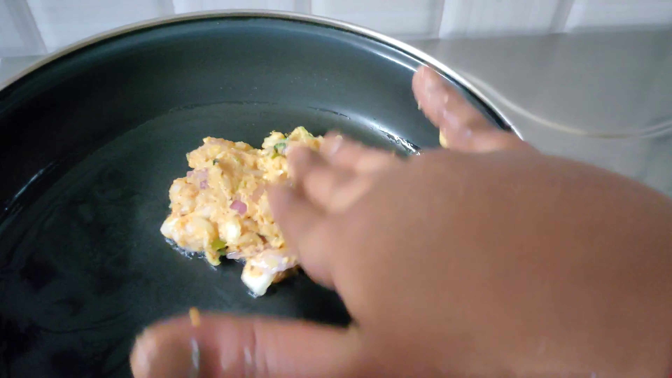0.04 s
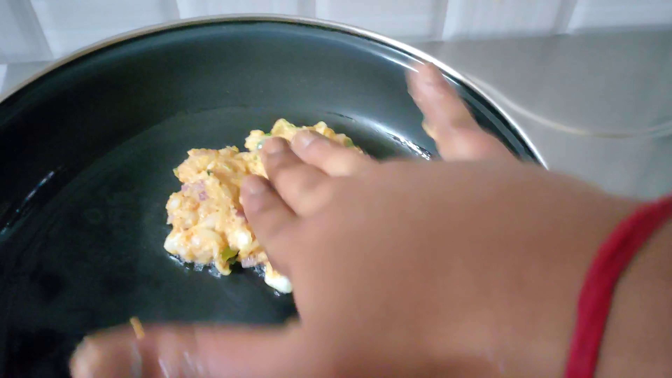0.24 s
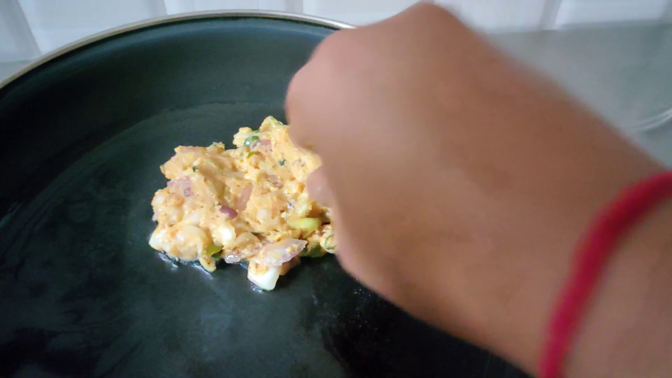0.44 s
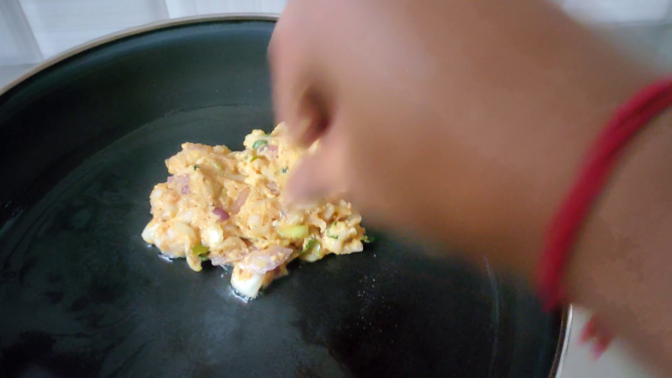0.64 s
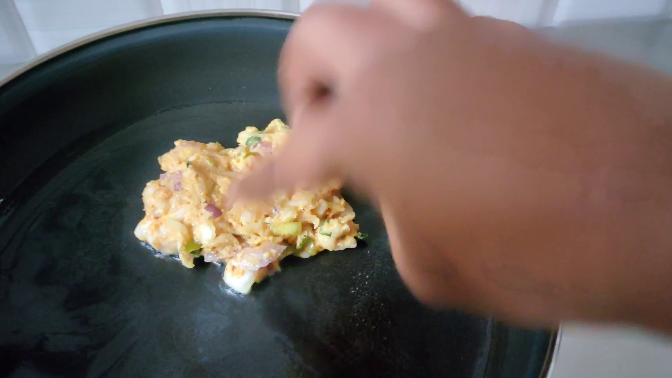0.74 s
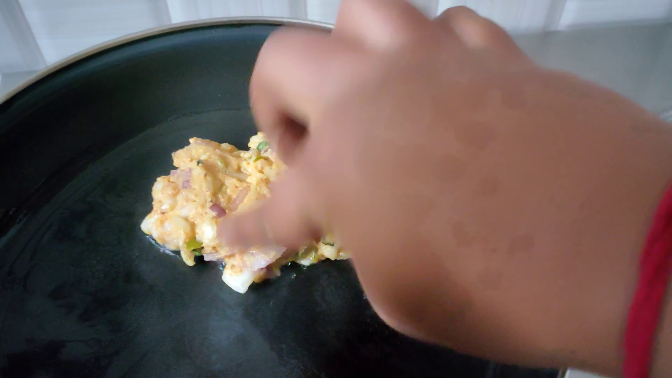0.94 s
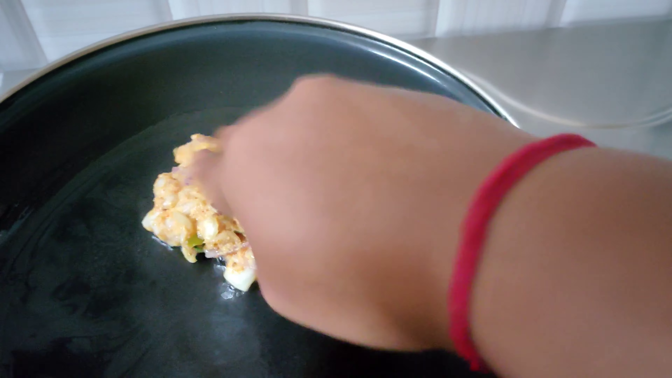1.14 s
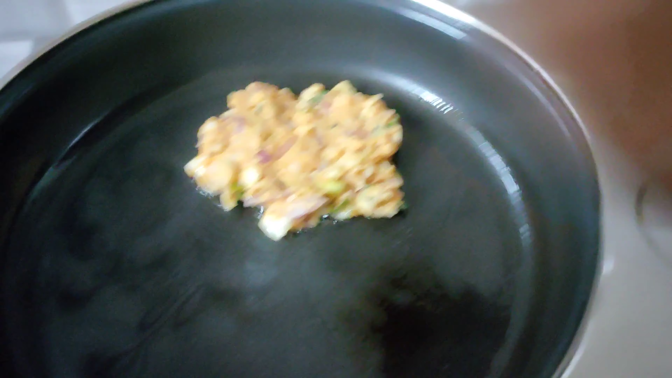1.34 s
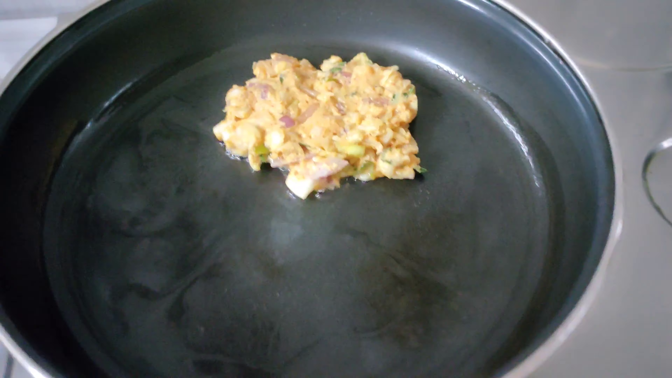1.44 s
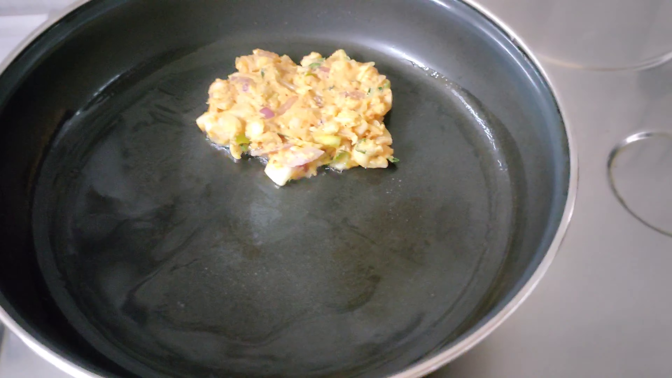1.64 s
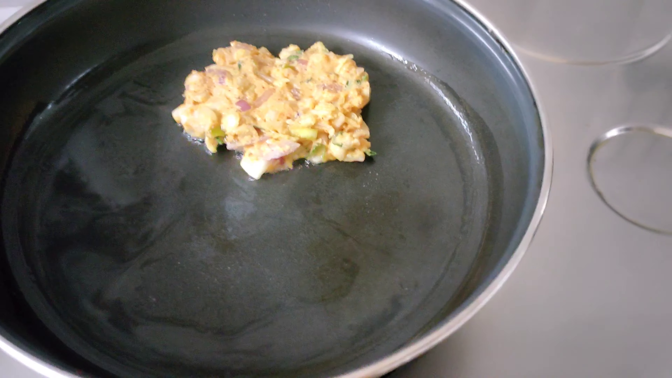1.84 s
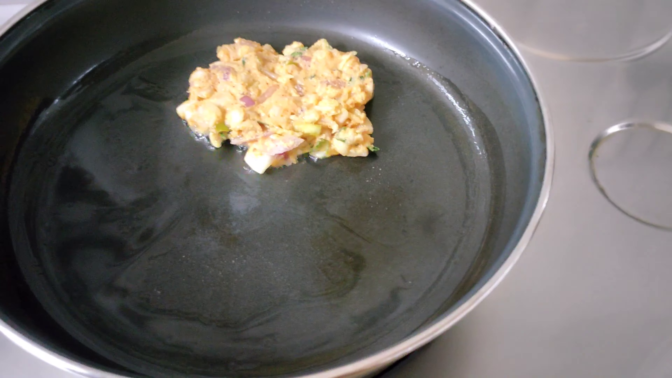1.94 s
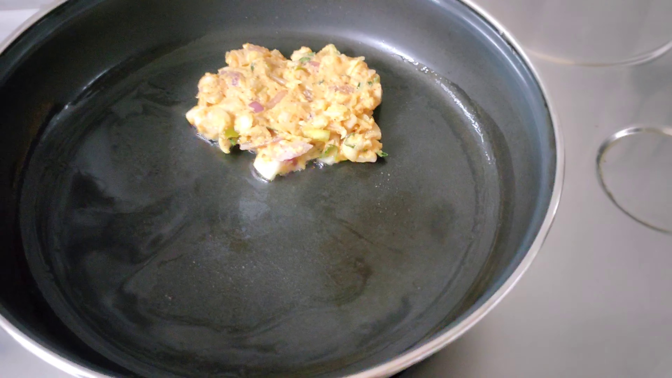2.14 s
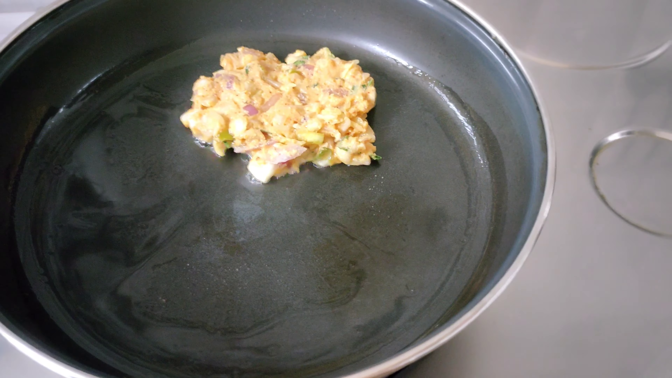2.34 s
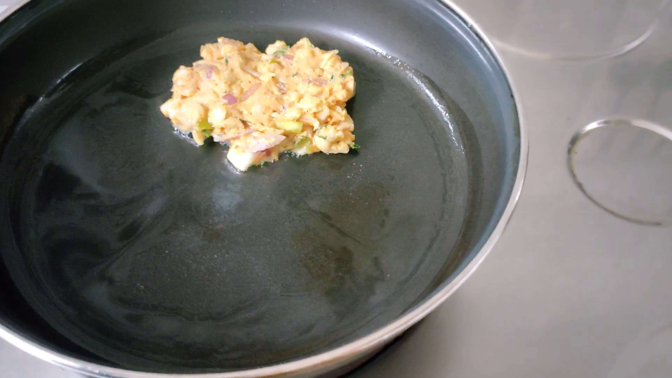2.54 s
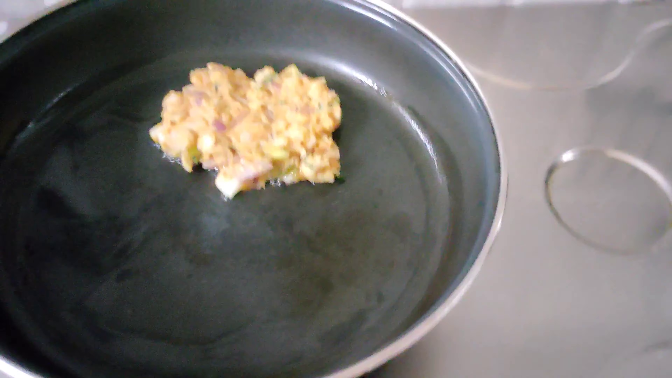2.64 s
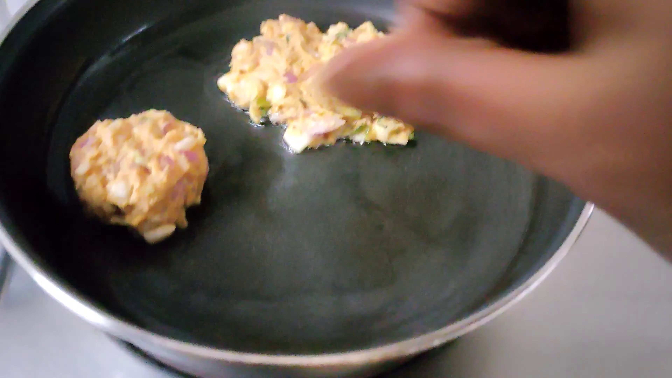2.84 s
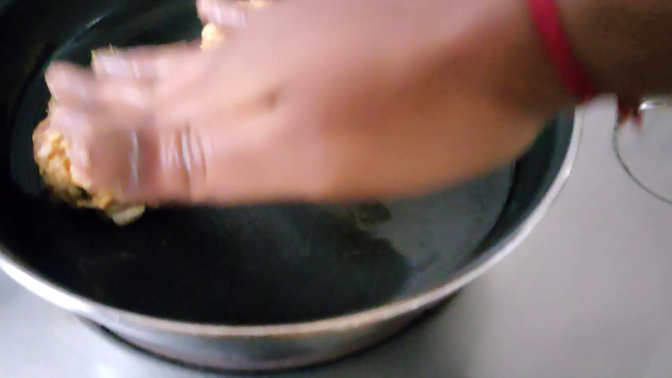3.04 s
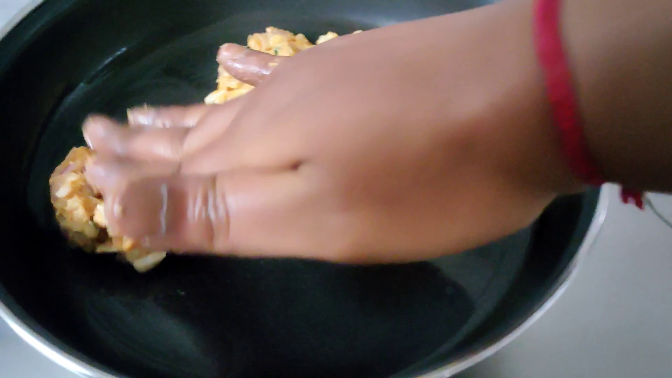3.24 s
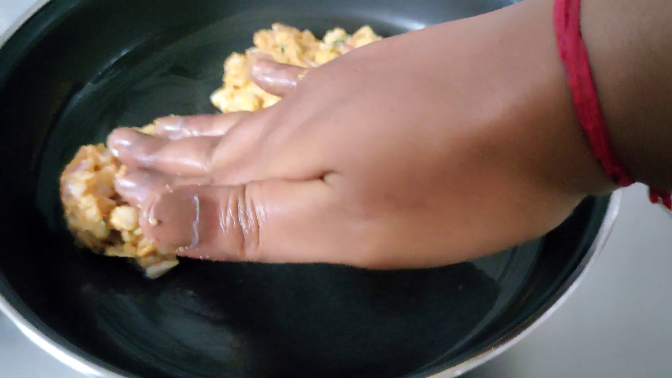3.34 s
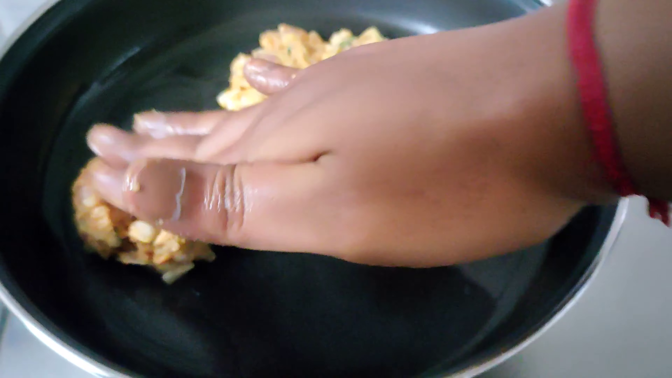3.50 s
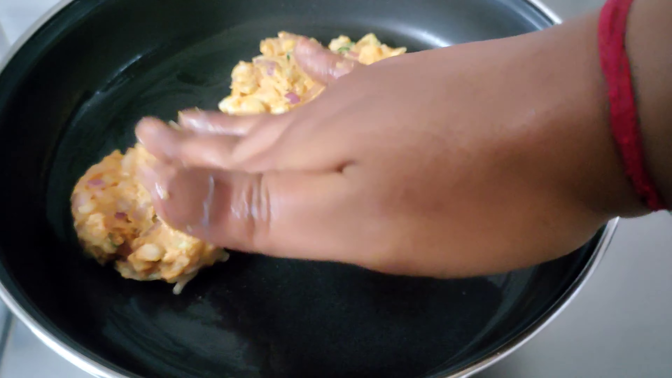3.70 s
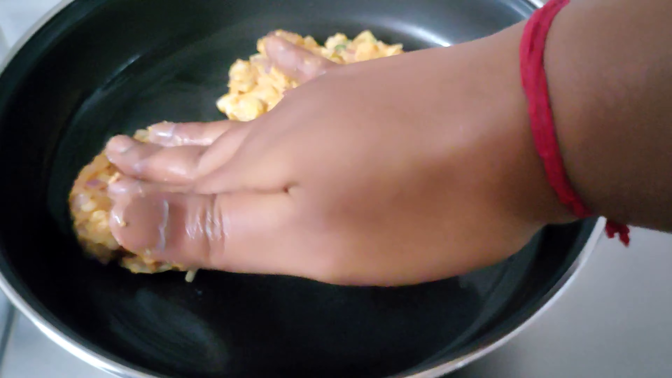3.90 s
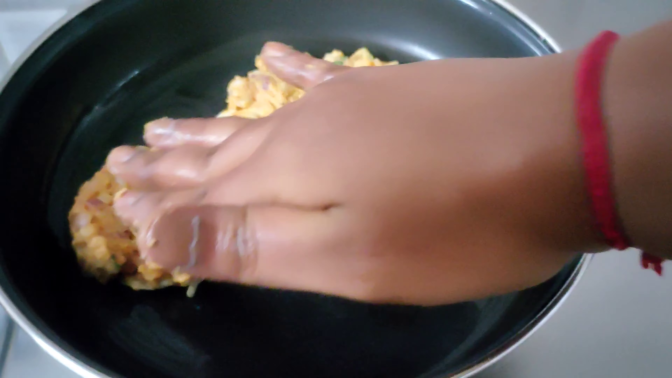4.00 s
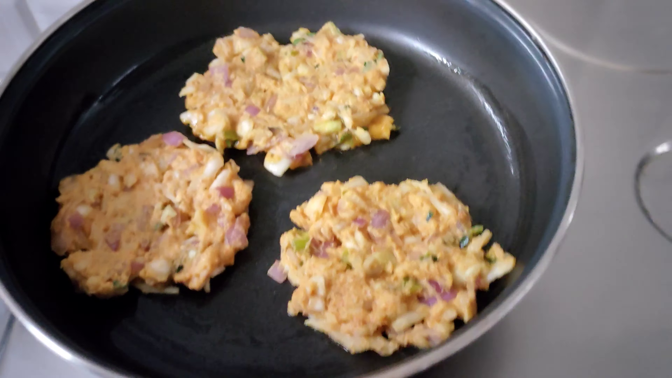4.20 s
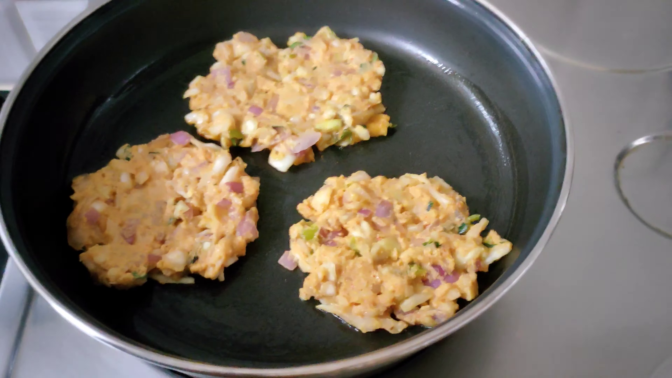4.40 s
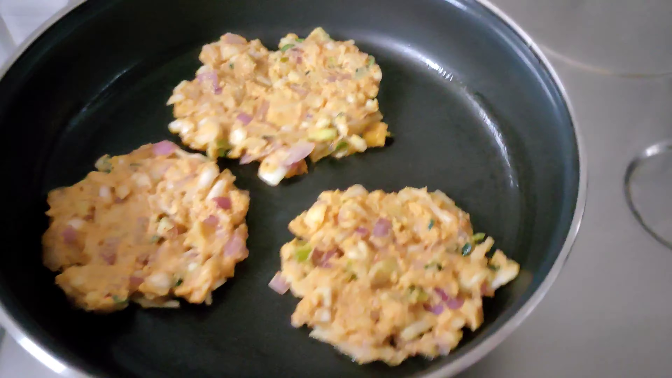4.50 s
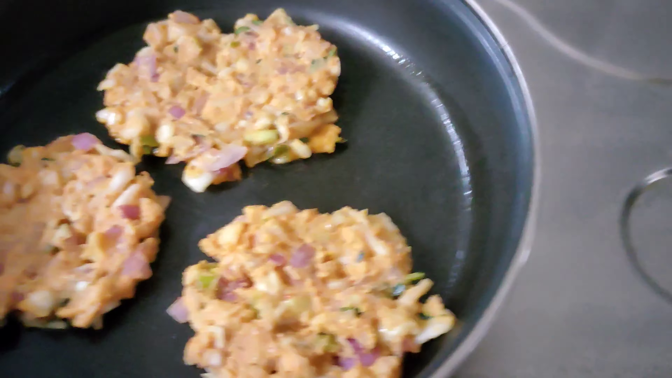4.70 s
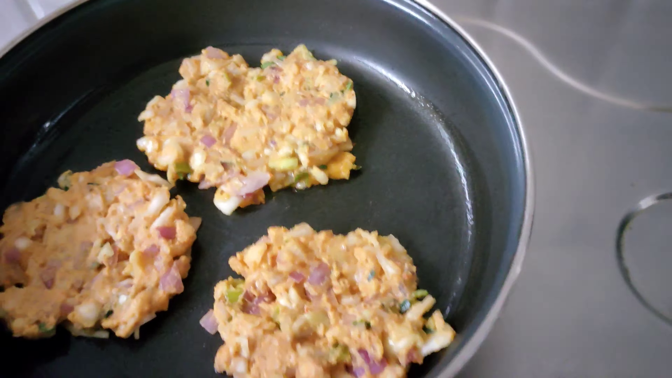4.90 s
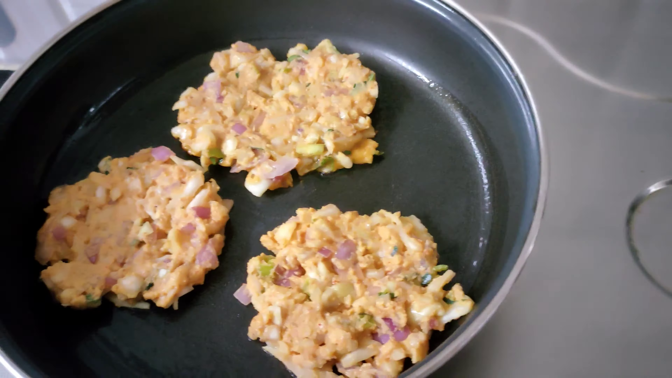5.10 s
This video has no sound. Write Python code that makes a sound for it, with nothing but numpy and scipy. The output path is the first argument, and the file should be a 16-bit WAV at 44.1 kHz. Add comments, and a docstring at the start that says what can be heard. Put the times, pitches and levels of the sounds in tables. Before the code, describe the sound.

Soft continuous frying with crackles and one sharp early pop, over a faint kitchen hum, interrupted by loud rubbing and small knocks on the camera.

```python
"""Fritters sizzle gently in a film of oil in a non-stick pan while a hand pats them flat: uneven bursts of
noise over a steady wash, growing from one fritter to a full pan. Steam spits in swells of grainy noise, and
larger bubbles pop as short bands of noise. A kitchen fan hums on three wavering tones over a low rumble.
The grip on a camera held close shifts: fingers scrape its case (gritty noise through resonances), bump it
(short dying tones) and brush over the microphone ports (a hiss and a hollow note)."""
import sys
import numpy as np
from scipy import signal
from scipy.fft import rfft, irfft
from scipy.io import wavfile

SR = 44100
rng = np.random.default_rng(int(sys.argv[2]) if len(sys.argv) > 2 else 0)


def transcribe(u):
    """Save the signal u as a 16-bit wav file named by the first command-line argument.

    u: samples, shape (n,) or (channels, n), limited to [-1, 1]; the rate is SR.
    q: integer samples, one column per channel.
    """
    v = np.clip(np.atleast_2d(u).T, -1, 1)
    q = np.round(v * 32767).astype(np.int16)
    wavfile.write(sys.argv[1], SR, q)


N = 262395
T = np.arange(N) / SR  # time of every sample [s]
HZ = np.fft.rfftfreq(N, 1 / SR)  # frequency of every spectrum bin


def amp(db):
    """Turns decibels into a plain factor."""
    return 10 ** (np.asarray(db) / 20)


def evened(x):
    """Scales a signal to an average (RMS) size of one."""
    return x / np.sqrt(np.mean(x ** 2) + 1e-20)


def read(points):
    """A spectrum, joined by straight lines on a log-frequency axis."""
    hz, value = np.transpose(points)
    return np.interp(np.log(HZ + 1), np.log(hz + 1), value)


def follow(rows):
    """The columns of a curve over time, at every sample."""
    s, *columns = np.transpose(rows)
    return [np.interp(T, s, column) for column in columns]


def add(mix, s, sound):
    """Lays a sound into the mix at time s."""
    part = mix[..., round(s * SR):][..., :sound.shape[-1]]
    part += sound[..., :part.shape[-1]]


def colour(x, db):
    """Filters with the given gain in dB, causally: it rings after a click, never before."""
    log_gain = irfft(np.log(amp(np.maximum(db, -100))), N)
    # folding the log gain onto positive times makes the filter minimum-phase
    fold = 1 + np.sign(N / 2 - np.arange(N))
    fold[0] = 1
    response = np.exp(rfft(log_gain * fold))
    return irfft(rfft(x) * response, N)


def body(spectrum, modes=()):
    """Gain in dB of a broad colour with resonances standing out of it; passes white noise at equal power."""
    peaks = sum(amp(db) ** 2 / (1 + (2 * (HZ - hz) / width) ** 2) for hz, width, db in modes)
    gain = amp(read(spectrum)) * np.sqrt(1 + peaks)
    return 20 * np.log10(evened(gain))


def pair(x, likeness):
    """Mixes two unrelated channels so that they are as alike as the table says at each frequency."""
    same = np.clip(read(likeness), -1, 1)
    a, b = rfft(x)
    turn = np.arcsin(same) / 2
    left = a * np.cos(turn) + b * np.sin(turn)
    right = b * np.cos(turn) + a * np.sin(turn)
    return irfft([left, right], N)


def treble(x, hz):
    """The part of a sound above hz, with a gentle slope below."""
    return irfft(rfft(x) * HZ ** 2 / (HZ ** 2 + hz ** 2), N)


def grains(per_s, spread_db, length, wash):
    """Tiny bursts of uneven size, timed alike in both channels, over a wash of countless smaller ones."""
    struck = rng.random(N) < per_s / SR
    size = amp(spread_db * np.minimum(rng.exponential(1, N), 5)) * struck
    power = signal.lfilter([1], [1, -np.exp(-2 / (length * SR))], size ** 2)  # length: dying time in s
    wash = np.clip(wash, 0, 1)
    loudness = np.sqrt(wash + (1 - wash) * power / power.mean())
    return loudness * rng.standard_normal((2, N))


def drift(hz):
    """Random wander of unit (RMS) size, with little movement faster than hz."""
    return evened(irfft(rfft(rng.standard_normal(N)) / (1 + (HZ / hz) ** 4), N))


def echoes(x, t60):
    """A short, dense tail, different on each side; it falls by 60 dB in t60 seconds."""
    t = T[:SR // 3]
    tail = rng.standard_normal((2, len(t))) * amp(-60 * t / t60)
    return signal.fftconvolve(x, tail / np.linalg.norm(tail[0]), axes=1)[:, :N]


def swells(s, db, rise, hold, fall):
    """Soft onsets that are full at their times s, hold, and die away; their powers add."""
    power = np.zeros(N)
    for full_s, full_db, up, stay, down in np.broadcast(s, db, rise, hold, fall):
        near = (T > full_s - 3 * up) & (T < full_s + stay + 8 * down)
        t = T[near] - full_s
        rising = -(t / up) ** 2
        dying = -np.maximum(t - stay, 0) / down
        power[near] += (amp(full_db) * np.exp(np.where(t < 0, rising, dying))) ** 2
    return np.sqrt(power)


def frying(full):
    """Level and treble lift of the sizzle in dB: they follow the hand's pressure and how full the pan is."""
    # the hand presses wet batter onto the pan and it fries harder:
    # full_pressure_s, hold_s, extra_db, treble_lift_db
    presses = [(0.0, 0.88, 2.0, 5), (1.05, 0.25, 2.5, 2), (2.98, 0.96, 2, 2.5)]
    rise_s, fall_s = 0.081, 0.033
    # the oil left to itself: one fritter, then what the full pan adds
    one_db, one_lift_db = -49.5, -1.5
    full_db, full_lift_db = 0.72, -4
    level_db = one_db + full_db * full
    lift_db = one_lift_db + full_lift_db * full
    for s, hold_s, extra_db, bright_db in presses:
        pressure = swells(s, 0, rise_s, hold_s, fall_s)
        level_db = level_db + extra_db * pressure
        lift_db = lift_db + bright_db * pressure
    return level_db, lift_db


def sizzle():
    """Steam bubbles burst at the rim of the batter and make grainy noise; spurts of steam spit from under it."""
    # colour of the fizz of one fritter and of the full pan: pitch_hz, level_db (per Hz)
    fizz_one = [(250, -19.5), (500, -14), (850, -11.5), (1100, -2.5), (1350, -4.5), (1600, -1.5),
                (2400, -0.5), (3300, -4), (6000, -2), (8000, -7), (11000, -11), (15500, -8)]
    fizz_full = [(250, -33), (500, -8), (900, -2), (1300, -1), (1600, 2.5), (2600, 2.5), (3600, -1),
                 (4900, 6), (6800, 5), (8000, 1), (11000, -4), (15500, -4.5)]
    # the pan fills up: time_s, share of the full pan (0 to 1)
    filling = [(3.7, 0.0), (4.05, 1.0)]
    # which side hears the first fritter, and the full pan, better: pitch_hz, left_minus_right_db
    one_side = [(600, 1.5), (1500, -1.5), (2500, 1.5), (6400, 1.5), (7200, -2.5), (8200, -4.5),
                (10000, -4.5), (12000, -0.5), (15000, 0)]
    full_side = [(500, -1.5), (2500, 0), (4000, 3), (6000, 4.5), (7000, 12), (8000, -0.5), (15000, 0)]
    # spurts of steam from under the batter: full_s, level_db (before the spit is boosted), dying_s
    spurts = [(0.008, -46, .015), (0.085, -51, .1), (0.175, -36, 0.0062), (0.222, -46.5, 0.011),
              (0.384, -43, 0.013), (0.522, -42, 0.026), (0.607, -47, 0.008), (1.012, -52.5, .015),
              (1.079, -46, 0.016), (1.147, -45.5, 0.031), (1.2, -47, .015), (1.911, -47, 0.025),
              (2.37, -51.5, .05), (3.1, -47, 0.07), (3.584, -49, 0.016)]
    spurt_rise_s = 0.01
    # share of the fizz that merges into a wash, and how much the finest fizz flickers
    wash_one, wash_full, flicker_db = .88, .95, 1.4

    full = np.clip(follow(filling)[0], 0, 1)
    level_db, lift_db = frying(full)
    wash = wash_one + (wash_full - wash_one) * full
    bubbles = grains(per_s=530, spread_db=8.5, length=0.002, wash=wash) * amp(1.08 * drift(hz=42.4))
    sides = np.array([[.5], [-.5]])
    one = colour(bubbles, body(fizz_one) + sides * read(one_side))
    many = colour(bubbles, body(fizz_full) + sides * read(full_side))
    fizz = (1 - full) * one + full * many
    # the share of the smallest bubbles keeps changing
    fine_gain = amp(lift_db + flicker_db * drift(hz=35))
    fizz += (fine_gain - 1) * treble(fizz, hz=6240)
    # fine droplets tick on the open oil, less as the pan fills
    ticks = (1 - full) * treble(grains(per_s=65, spread_db=-2.0, length=0.00094, wash=0), hz=7000)
    s, spurt_db, dying_s = np.transpose(spurts)
    steam = swells(s, spurt_db, spurt_rise_s, 0, dying_s)
    spit = colour(steam * grains(per_s=540, spread_db=2.5, length=0.00017, wash=0.44), body(fizz_one))
    oil = amp(level_db) * (fizz + amp(-11.0) * ticks) + amp(5.5) * spit
    # a very short, dense tail, different on each side, roughens the sizzle's colour
    return oil + amp(-6) * echoes(oil, t60=0.056)


def fan():
    """A fan's wavering hum, at one, two and three times its speed, over the rumble of the kitchen."""
    # level of the three tones, before the gains below: time_s, first_db, second_db, third_db
    tone_levels = [(0.0, -52, -54.5, -64), (0.5, -60, -59.5, -73), (0.56, -46.5, -61, -66),
                   (1.31, -67, -53.5, -72), (2.42, -59, -62, -66), (2.78, -54, -46.5, -76),
                   (3.13, -48.5, -49.5, -53), (4.96, -54, -60, -63), (5.83, -53, -52.5, -53),
                   (5.95, -51, -49, -61)]
    gains_db = [1.5, 2.5, -0.5]
    # speed around which the fan wanders: time_s, speed_hz
    speed = [(0, 48.5), (1.1, 48.38), (2.3, 44.4), (3.1, 45.5), (4.9, 47.15), (5.4, 45.03)]
    wander_hz = .8
    # colour of the kitchen rumble: pitch_hz, level_db (per Hz)
    rumble_colour = [(12, 2), (30, -1.5), (55, 1.5), (80, 5), (125, -3.5), (170, -6.5), (250, -14.5),
                     (400, -15), (700, -17.5), (1200, -18), (3000, -44)]
    # how alike left and right are in the kitchen: pitch_hz, likeness (1 = the same)
    room_likeness = [(60, 0.92), (130, 0.99), (290, 0.8), (640, 0.8), (1400, 1), (3100, 0.39), (7000, 0.32)]

    turns = np.cumsum(follow(speed)[0] + wander_hz * drift(hz=6.7)) / SR
    hum = np.zeros(N)
    for k, (db, gain_db) in enumerate(zip(follow(tone_levels), gains_db), 1):
        level = amp(db + gain_db + 2.05 * drift(hz=6.1))
        hum += level * np.sin(2 * np.pi * (k * turns + rng.random()))
    rumble = colour(pair(rng.standard_normal((2, N)), room_likeness), body(rumble_colour))
    return (hum + amp(-53.5) * rumble) * amp([[-.4], [.4]])  # left, right


def scrapes():
    """Skin sticks and slips on the case: gritty noise, stroke by stroke, through the case's resonances."""
    # strokes of the fingers: full_s, level_db (before the overall trim), sliding_s, treble_lift_db
    strokes = [(0.099, -49, 0.015, -20), (0.224, -52, 0.0028, 10), (3.043, -31, 0.01, -4),
               (3.076, -39.5, 0.0032, 2), (3.16, -20.5, 0.032, -1), (3.28, -31, 0.0084, -3.5),
               (3.308, -33, 0.0031, -2.5), (3.416, -23, 0.021, -0.5), (3.461, -33, 0.01, -5),
               (3.507, -38, .003, -30), (3.652, -44, .003, -24), (3.772, -29.5, 0.0065, 2),
               (3.797, -33.5, .004, -2.5), (3.838, -27, 0.0084, 0.5), (3.884, -28, 0.016, -3)]
    # broad colour of the case: pitch_hz, level_db (per Hz)
    case = [(30, -46), (70, -8), (130, -12), (200, -10), (300, -9.5), (450, -4), (620, -10.5), (760, -8.5),
            (1200, -11.5), (2200, -14.5), (3300, -16.5), (5800, -18.5), (8400, -27.5), (11000, -31.5),
            (15500, -35)]
    # resonances of the case: pitch_hz, width_hz, level_db
    case_modes = [(240, 28, 8), (314, 20, 14), (443, 40, 10), (545, 28, 5), (663, 22, 6), (746, 55, 7),
                  (1160, 35, 4), (1250, 40, 5), (1345, 45, 8), (1540, 40, 6), (1942, 28, 7), (2389, 35, 6),
                  (2946, 35, 6)]
    # how alike left and right are on a rubbed case: pitch_hz, likeness (1 = the same)
    case_likeness = [(130, 0.87), (320, 0.95), (640, 0.51), (1400, 0), (3100, 0.18), (7000, 0)]
    # every stroke grips quickly and lets go slowly, leaving a faint drag behind
    grip_s, let_go_s = 0.0086, 0.016
    drag_db, drag_s = -15.5, .033
    # how unevenly the skin catches
    catch_db, catch_hz = 1.5, 90

    slips = pair(grains(per_s=600, spread_db=2.2, length=.0006, wash=.5), case_likeness)
    slips = slips * amp(catch_db * drift(hz=catch_hz))
    s, db, slide_s, lift_db = np.transpose(strokes)

    def stroke_force(level_db):
        """The strokes' loudness over time, with the drag they leave."""
        stroke = swells(s, level_db, grip_s, slide_s, let_go_s)
        return stroke + swells(s, level_db + drag_db, grip_s, slide_s, drag_s)

    high = treble(slips, hz=1050)
    rubbing = stroke_force(db) * (slips - high) + stroke_force(db + lift_db) * high
    rub = colour(rubbing, body(case, case_modes))
    # a short random tail follows the scrapes' treble
    return amp(-0.88) * (rub + amp(-4.0) * echoes(treble(rub, hz=2995), t60=0.034))


def pops():
    """A larger bubble snaps: a dying burst of noise in a wide band around its own pitch."""
    # single bubbles that burst: start_s, peak_db (before the short tail), pitch_hz
    bursts = [(0.1752, -12, 4600), (0.22, -34, 2980), (0.266, -26.5, 10100), (0.523, -32, 2200),
              (0.75, -31, 6500), (1.14, -32, 3800), (1.253, -38, 8050), (1.521, -34, 11000),
              (1.901, -25.5, 6850), (2.648, -27, 10100), (2.935, -32.5, 8000)]
    dying_cycles = 10.2  # higher pops die sooner
    out, t = np.zeros((2, N)), T[:1024]
    for s, db, hz in bursts:
        edges_hz = [min(hz * .68, SR / 3), min(hz * 1.35, SR / 2.1)]
        band = signal.butter(2, edges_hz, "band", fs=SR)
        burst = rng.standard_normal((2, len(t))) * np.exp(-t * hz / dying_cycles)
        snap = signal.lfilter(*band, burst)
        add(out, s, amp(db) * snap / abs(snap).max())
    return out + amp(-7) * echoes(out, t60=0.09)


def bumps():
    """The grip bumps the case: dull knocks of two or three cycles, nearer the right port."""
    # start_s, level_db (before the dying away, bass cut and side gains), pitch_hz
    knocks = [(3.986, -24, 426), (4.33, -23.5, 433), (4.356, -36, 448), (4.4007, -31.5, 460),
              (4.418, -31, 400), (4.4397, -27, 404), (5.3058, -28, 446)]
    out, t = np.zeros(N), T[:2048]
    for s, db, hz in knocks:
        add(out, s, amp(db) * np.sin(2 * np.pi * hz * t) * np.exp(-t / 0.002))
    return treble(out, hz=225) * amp([[-6], [3]])  # left, right


def brushes():
    """The gap between fingertip and port hisses and rings with a wavering hollow note."""
    # a fingertip brushes the ports, levels before the side gains: full_s, hiss_db, hollow_note_db, rise_s, hold_s
    touches = [(4.714, -33, -36.5, 0.0073, 0.016), (4.787, -45, -43, 0.0072, .001),
               (5.339, -47.5, -43.5, 0.011, 0.029), (5.485, -43, -52, 0.064, .012)]
    # colour of air hissing under the fingertip: pitch_hz, level_db (per Hz)
    port = [(300, -0.5), (700, 10), (1100, -8.5), (2000, 4), (4000, -0.5), (6000, -1), (8000, -2),
            (12000, -8), (15500, -6)]
    # resonances of that air: pitch_hz, width_hz, level_db
    port_modes = [(1596, 85, 8.2), (2070, 48, 7.5), (3000, 71, 5.8), (3720, 36, 16.4), (4750, 110, 20.6),
                  (5860, 150, 15.3)]
    # the hiss stops quickly; the hollow note builds up later and dies more slowly
    hiss_fall_s, note_lag_s, note_fall_s = 0.012, 0.0075, 0.019
    # centre pitch of the note at its loudest; it is flatter when less air drives it
    note_hz, sag_hz, waver_hz = 770, 31.7, 15

    s, hiss_db, hollow_db, rise_s, hold_s = np.transpose(touches)
    hiss = swells(s, hiss_db, rise_s, hold_s, hiss_fall_s) * rng.standard_normal((2, N))
    air = colour(hiss, body(port, port_modes))
    blown = swells(s + note_lag_s, hollow_db, rise_s, hold_s, note_fall_s)
    pitch_hz = note_hz - sag_hz * (1 - blown / blown.max()) + waver_hz * drift(hz=88.5)
    note = np.sin(2 * np.pi * np.cumsum(pitch_hz) / SR) * amp(4.0 * drift(hz=120))
    return air * amp([[3.5], [0]]) + blown * note * amp([[1.5], [3]])  # left, right


def scene():
    """All sources together, before the microphone."""
    return sizzle() + fan() + scrapes() + pops() + bumps() + brushes()


def record(dry):
    """Adds the colour of the microphone, then cuts everything above a steep upper limit."""
    # gain of the microphone: pitch_hz, gain_db
    mic = [(10000, 0.5), (11500, 1.5), (12500, -4.5), (14000, -5.5), (15500, -5.5)]
    # a ripple in its gain from echoes in its ports
    centre_hz, width_hz, spacing_hz, depth_db = 6250, 520, 207, 3.5
    edge_hz = 15550
    fade = np.exp(-((HZ - centre_hz) / width_hz) ** 2)
    ripple_db = depth_db * fade * np.cos(2 * np.pi * (HZ - centre_hz) / spacing_hz)
    heard = colour(dry, read(mic) + ripple_db)
    low_pass = signal.firwin(511, edge_hz, window=("kaiser", 9), fs=SR)
    return signal.oaconvolve(heard, low_pass[None], "same")


dry = scene()
out = record(dry)
transcribe(out)
```